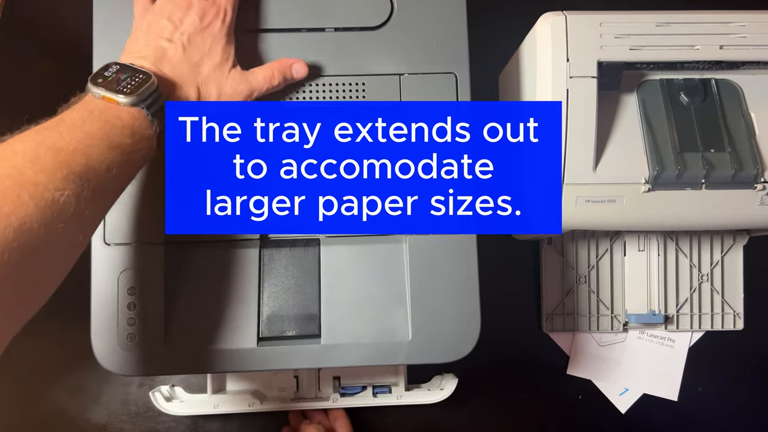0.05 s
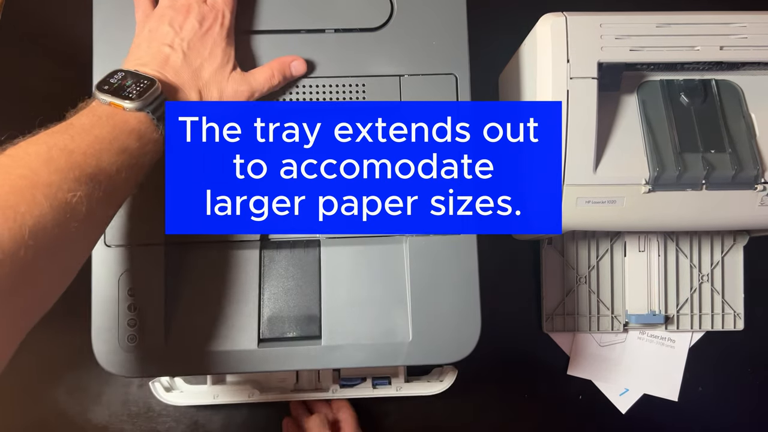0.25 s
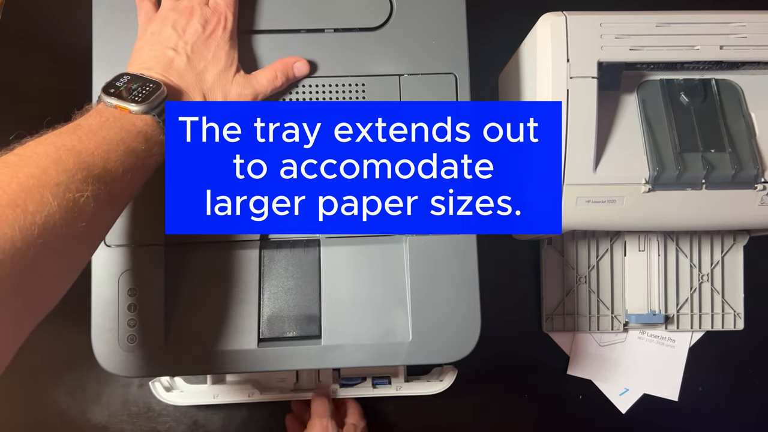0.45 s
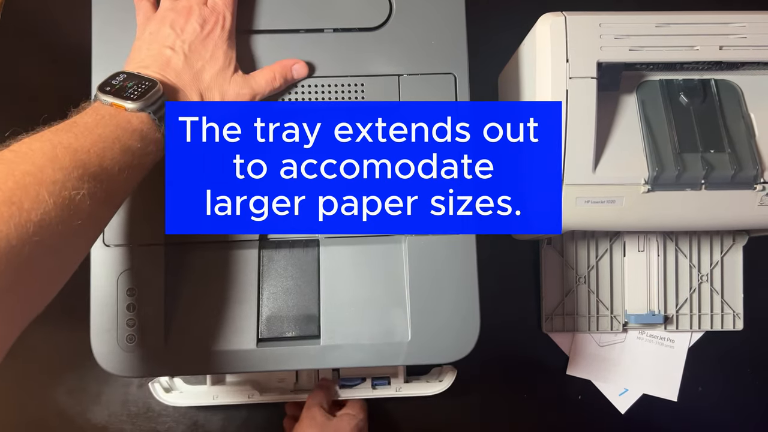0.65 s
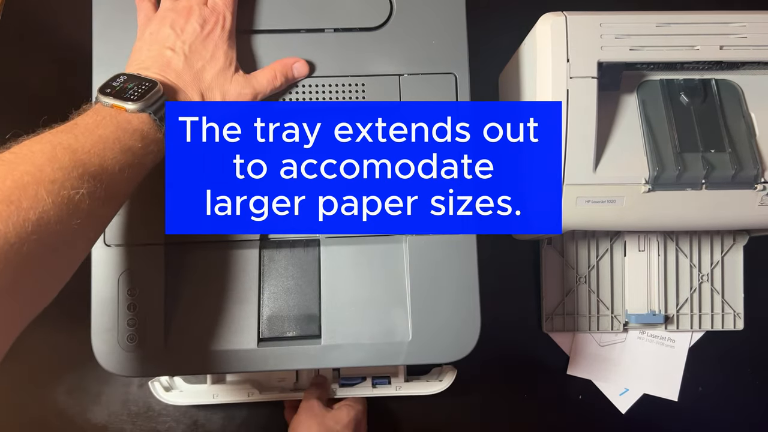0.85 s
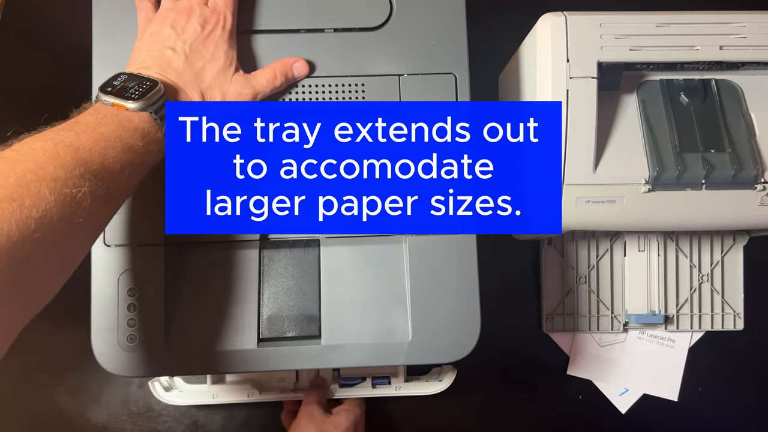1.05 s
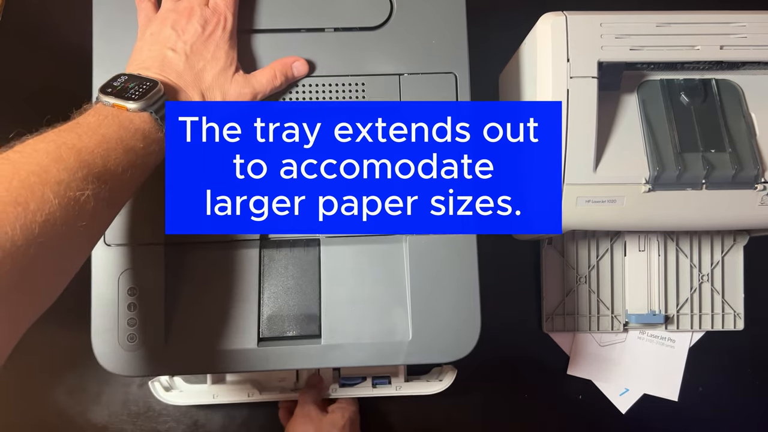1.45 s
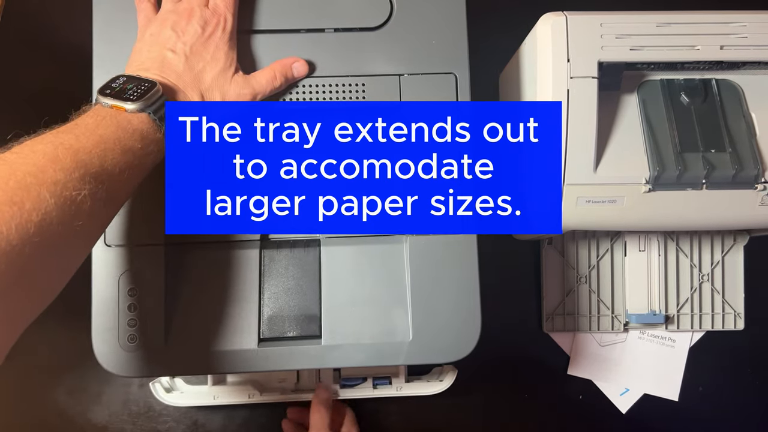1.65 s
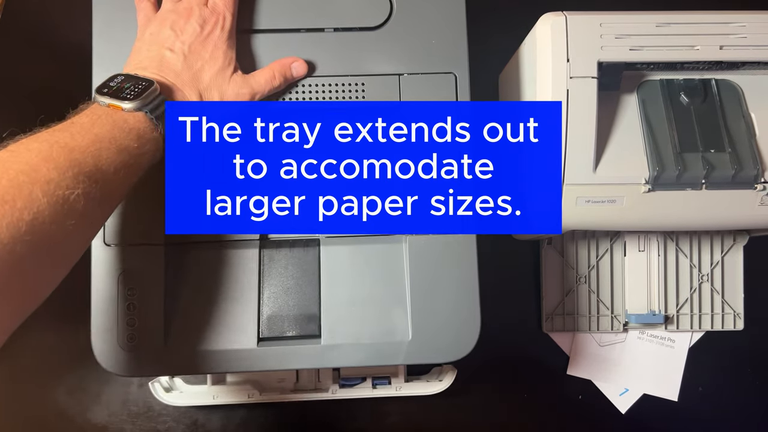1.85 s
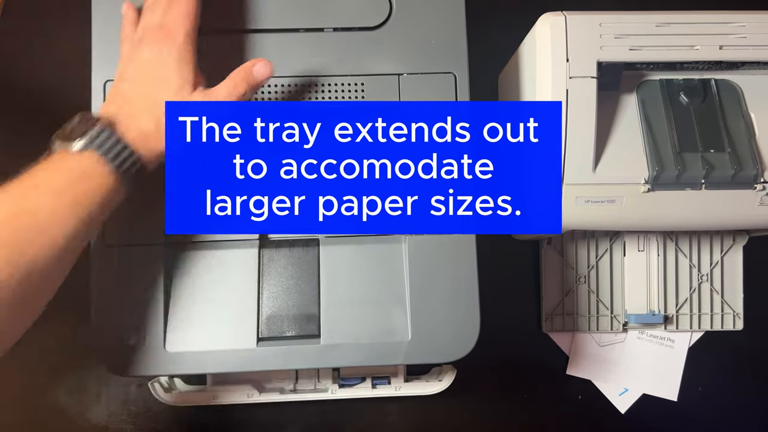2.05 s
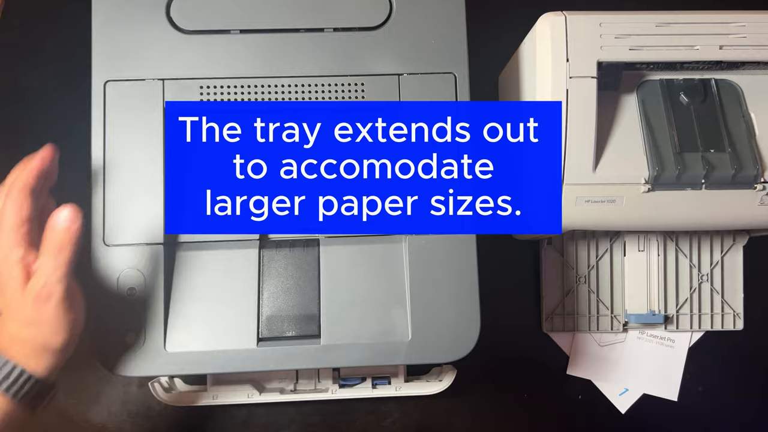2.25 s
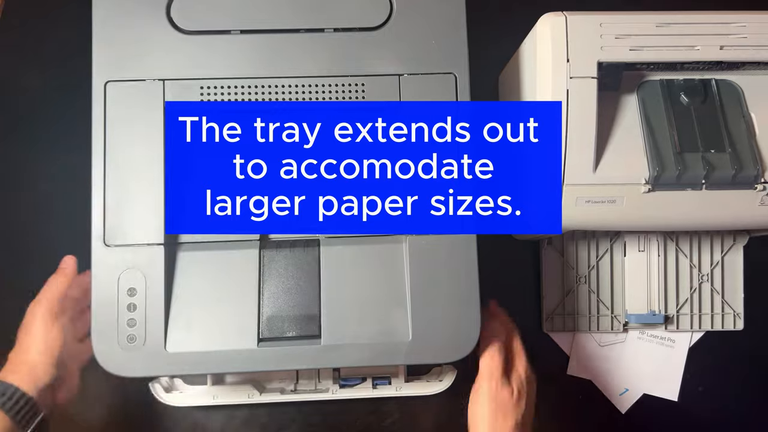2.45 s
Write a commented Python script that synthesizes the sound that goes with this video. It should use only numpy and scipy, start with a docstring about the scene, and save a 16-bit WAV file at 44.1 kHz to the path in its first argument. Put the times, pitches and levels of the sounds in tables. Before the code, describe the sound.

Close up in a small room, a plastic paper tray is shoved into a printer with a solid clunk. It snaps once, then rattles and knocks more softly as a hand jiggles it, over a faint low hum.

```python
"""In a small room, close by, a desk printer's plastic paper tray is shoved home, tugged and pushed again.
Sliding friction makes the tray scrape on its rails. Impacts excite damped resonances: the case clunks
and the desk booms, the tray knocks in its play and snaps against its end stop, and the catches tick.
Hands brush the plastic, and one lifts off the lid at the end. The room reverberates over a low hum."""
import sys
import numpy as np
from scipy import signal
from scipy.fft import rfft, irfft
from scipy.io import wavfile
from scipy.ndimage import uniform_filter1d

SR = 44100
rng = np.random.default_rng(int(sys.argv[2]) if len(sys.argv) > 2 else 0)


def int16_out(signal):
    """Quantize to a 16-bit WAV file."""
    q = np.round(np.clip(np.atleast_2d(signal).T, -1, 1) * 32767)
    wavfile.write(sys.argv[1], SR, q.astype(np.int16))


N = 110250

# mains hum partials: f/Hz, level/dB before the fade
HUM_PARTIALS = [(59.2, -57.5), (119, -64), (241, -67)]
# hand strokes: centre t/s, half length/s, level/dB, left minus right/dB
STROKES = [(0.006, 0.14, -51.5, -1), (1.377, 0.24, -53.5, -0.5), (1.988, 0.025, -49, 1)]
# pushes along the rails: start t/s, end t/s, final level/dB, relative depth of the swell
PUSHES = [(0.189, 0.243, -15, 26.5), (1.182, 1.202, -43.5, 0)]
# impacts: t/s, level/dB, bass/dB, treble/dB, T60/s of the noisy ring at 1 kHz
TRAY_HITS = [(.122, -51, 11.5, 9, 0.17), (.735, -39.5, 4, -4, 0.14), (.777, -39.5, -1, -7, 0.14),
             (.823, -30.5, 0.5, 0, 0.098), (.8415, -29.5, -1.5, -6.5, 0.032), (.8515, -36, 10.5, -9, 0.075),
             (1.085, -42, -7, 8, 0.075), (1.1048, -33.5, 4, 4, 0.081), (1.326, -45.5, -7, 9, 0.032),
             (1.357, -44, 15, -10, 0.046), (1.4612, -36, 4.5, -8, 0.13), (1.5925, -34, 1, -6, 0.16)]
CASE_HITS = [(0.2385, -12, -2, -8.5, 0.055), (.243, -17, -0.5, 2.5, .05), (0.2477, -14, 8, -1, 0.041),
             (0.257, -17.5, -7.5, -1.5, 0.17), (0.2736, -22.5, -4.5, -0.5, 0.17),
             (.302, -34.5, 8.5, 4, 0.1), (1.131, -29, 5, -7, 0.077), (1.138, -27.5, -1, -5, 0.12),
             (1.199, -23, -9, -4.5, 0.11), (1.2126, -32, 4.5, -1.5, 0.15), (1.865, -54, 12.5, -4.5, 0.14),
             (1.982, -50, 10.5, -3, 0.063)]
CATCH_HITS = [(.5462, -44.5, 16, -7, 0.073), (.7665, -43, 14.5, 5.5, 0.035), (.778, -41.5, -2, -2.5, 0.16),
              (1.416, -43, 0, -3, 0.091), (1.4255, -40.5, 16.5, -3.5, 0.069), (1.4625, -51, 3, -3.5, 0.026)]
STOP_HITS = [(.557, -18, -1.5, 2, 0.056)]
# spectral envelopes: f/Hz, relative spectral density/dB
AIR_SPECTRUM = [(25, -31), (55, -2.5), (90, -5), (250, -6), (400, -12.5), (1100, -19.5), (2000, -30.5),
                (5000, -44.5), (16000, -57)]
RUB_SPECTRUM = [(100, -1.5), (500, 1.5), (1000, -8), (2200, -11.5), (16000, -38)]
TRAY_SPECTRUM = [(60, -19.5), (190, -3), (400, -5), (720, -2), (1000, -5), (2300, -8.5), (3300, -16),
                 (7000, -30), (16000, -52.5)]
RAIL_SPECTRUM = [(100, -17.5), (220, -2), (500, -6.5), (1000, 0.5), (2000, -7.5), (16000, -21)]
CASE_SPECTRUM = [(60, -20.5), (200, -1), (500, -5.5), (1100, -6), (1700, -7), (7000, -15), (11000, -22),
                 (16000, -28.5)]
CATCH_SPECTRUM = [(100, -12), (1500, -0.5), (4000, -4), (6500, -10), (10000, -16), (16000, -40)]
# broad resonances of the part struck: f/Hz, width/Hz, gain/dB
TRAY_RESONANCES = [(238, 50, 2), (658, 70, 6), (1155, 90, 9.5), (1277, 96, 8.2), (1638, 120, 7.1),
                   (1910, 120, 6)]
CASE_RESONANCES = [(226, 95, 5), (438, 61, 7), (605, 90, 6.5), (880, 100, 3), (1160, 140, 5),
                   (2310, 240, 5), (4270, 230, 3.5)]
CATCH_RESONANCES = [(1636, 300, 3.9), (5270, 710, 6.7)]
STOP_RESONANCES = [(174, 210, 7.5), (840, 100, 7.5), (1139, 182, 14.5), (1495, 65, 7.5), (1820, 230, -4.5),
                   (2123, 330, 4.5), (2502, 700, 7)]
# normal modes of case and tray, and of the catches: f/Hz, relative level/dB, T60/s
BODY_MODES = [(242, -4, 0.3), (434.6, -6, 0.15), (611, -7.5, 0.24), (879, -7, .25), (1210, -7.5, 0.14),
              (1483, -13, 0.25), (2340, -10, .17), (2890, -14, 0.067)]
CATCH_MODES = [(5400, -12, 0.025)]
# reverberation: f/Hz, T60/s, level/dB
REVERB = [(100, 0.57, -7.5), (255.4, 0.54, -8.5), (500, 0.41, -7.5), (1000, .48, -10), (2003, 0.45, -8),
          (3500, .56, -7.5), (7000, 0.34, -6.5), (14000, 0.21, -11)]
# stereo width of the direct and the diffuse field: f/Hz, side relative to mid/dB
DIRECT_WIDTH = [(150, -23.5), (350, -17.5), (700, -2), (1400, -15), (3000, -3.5), (12000, -1)]
DIFFUSE_WIDTH = [(150, -14.5), (350, -13), (700, -1.5), (3000, -6)]
# stereo balance: f/Hz, left minus right/dB
BALANCE = [(150, -1.1), (400, -2), (1400, -2.3), (3500, -.5), (12000, -.2)]

WHITE = [(20, 0), (20000, 0)]  # flat spectrum: f/Hz, level/dB
SIDES = np.array([[1], [-1]])  # left, right
BANDS_HZ = 62.5 * 2. ** np.arange(9)
RING_N = 16384  # samples per impact


def undb(db):
    """Amplitude ratio of a level in decibels."""
    return 10 ** (np.asarray(db) / 20)


def at(table, hz, column=1):
    """Interpolation of a table along logarithmic frequency."""
    table = np.array(table, float)
    return np.interp(np.log(np.maximum(hz, 1)), np.log(table[:, 0]), table[:, column])


def add(out, start, sound):
    """Superposition of a sound from a given time on."""
    i = int(start * SR)
    out[:, i:i + sound.shape[1]] += sound[:, :N - i]


def decay(t, t60):
    """Exponential damping, 60 dB in t60."""
    return np.exp(-np.log(1000) * t / t60)


def noise(colour, width, size, grain=0):
    """Spectrum of shaped stereo noise; grain is random amplitude modulation that breaks it into clicks."""
    hz = np.fft.rfftfreq(size, 1 / SR)
    white = rng.standard_normal((2, size))
    white *= np.exp(grain * np.repeat(rng.standard_normal(size // 32 + 1), 32)[:size])
    mid, side = rfft(white / white.std())
    gain, spread = undb(at(colour, hz)), undb(at(width, hz))
    pair = (mid + SIDES * spread * side) / np.hypot(1, spread) * undb(SIDES * at(BALANCE, hz) / 2)
    return pair * gain / np.sqrt(np.mean(gain ** 2))


def octaves(spectrum, size):
    """Filter bank of overlapping octaves, giving pairs of centre f/Hz and waveform."""
    hz = np.fft.rfftfreq(size, 1 / SR)
    return [(centre, irfft(spectrum * at(np.c_[BANDS_HZ, weights], hz), size))
            for centre, weights in zip(BANDS_HZ, np.eye(len(BANDS_HZ)))]


def minimum_phase(sound, db):
    """Causal filter with a gain in dB at each frequency, formed by folding the cepstrum."""
    size = sound.shape[1]
    cepstrum = irfft(np.log(undb(db)))
    return irfft(rfft(sound) * np.exp(rfft(2 * cepstrum[:size // 2], size) - cepstrum[0]))


def chatter(t60, hold_s=0.0057, rise_cycles=0.99):
    """Contact chatter sustains a noise burst, then damping takes over; lows build and die more slowly."""
    t, hz = np.arange(RING_N) / SR, np.fft.rfftfreq(RING_N, 1 / SR)
    burst, energy = 0, []
    for centre, band in octaves(noise(WHITE, DIRECT_WIDTH, RING_N), RING_N):
        rise = 1 - np.exp(-t * centre / rise_cycles)
        envelope = rise * decay(np.maximum(t - hold_s, 0), t60 * (1000 / centre) ** 0.32)
        burst = burst + band * envelope
        energy.append((centre, np.sum(envelope ** 2)))
    # even out chance peaks and dips in the spectrum
    power = uniform_filter1d(np.mean(abs(rfft(burst)) ** 2, axis=0), size=41)
    return minimum_phase(burst, 10 * np.log10(at(energy, hz) / power))


def impacts(hits, colour, resonances, modes, modes_db, scatter_db=3):
    """Impact excitation: a burst passes through broad resonances and the normal modes ring freely."""
    out, t, freqs = np.zeros((2, N)), np.arange(RING_N) / SR, np.fft.rfftfreq(RING_N, 1 / SR)
    body_db = at(colour, freqs)
    body_db += sum(lift / (1 + (2 * (freqs - hz) / width) ** 2) for hz, width, lift in resonances)
    body_db -= 10 * np.log10(np.mean(undb(body_db) ** 2))  # unit mean power
    for start, db, bass_db, treble_db, t60 in hits:
        tilt = [(250, bass_db), (900, 0), (1500, 0), (5000, treble_db)]
        ring = minimum_phase(chatter(t60), body_db + at(tilt, freqs))
        for hz, mode_db, mode_t60 in modes:
            strength, detune, phase, skew = rng.standard_normal(4)
            gain = undb(modes_db + mode_db + at(tilt, hz) + scatter_db * strength)
            pan = undb(SIDES * at(BALANCE, hz) / 2)
            angle = 2 * np.pi * (hz * (1 + 0.0041 * detune) * t + phase)
            stereo_shift = SIDES * skew * undb(at(DIRECT_WIDTH, hz))
            envelope = decay(t, mode_t60) * (1 - np.exp(-t * hz))
            ring += gain * pan * np.sin(angle + stereo_shift) * envelope
        add(out, start, undb(db) * ring)
    return out


def hum_and_air(air_db=-58.5):
    """Near-harmonic partials of mains hum sink late in the scene, over the broadband noise of room air."""
    t = np.arange(N) / SR
    hum = sum(np.sqrt(2) * undb(db) * np.sin(2 * np.pi * (hz * t + rng.random()))
              for hz, db in HUM_PARTIALS)
    fade_db = np.interp(t, (1.3, 1.82), (4.5, -3))
    air = irfft(noise(AIR_SPECTRUM, DIFFUSE_WIDTH, N), N)
    return hum * undb(fade_db) + undb(air_db) * air


def hand_rubs():
    """Friction of skin on plastic gives noise in soft Gaussian swells."""
    t = np.arange(N) / SR
    swell = sum(undb(db + SIDES * pan_db / 2) * np.exp(-((t - centre) / half) ** 2)
                for centre, half, db, pan_db in STROKES)
    return swell * irfft(noise(RUB_SPECTRUM, DIRECT_WIDTH, N, grain=0.3), N)


def tray_knocks():
    """Backlash: the tray crosses its play and strikes, exciting its resonances."""
    return impacts(TRAY_HITS, TRAY_SPECTRUM, TRAY_RESONANCES, BODY_MODES, modes_db=-16.5)


def rail_scrape(stop_s=0.01):
    """Sliding friction grows louder and brighter as the tray gains speed, and dies when it stops."""
    t, out = np.arange(N) / SR, 0
    bands = octaves(noise(RAIL_SPECTRUM, DIRECT_WIDTH, N, grain=0.35), N)
    for start, end, db, swell in PUSHES:
        progress = np.clip((t - start) / (end - start), 0, 1)
        contact = np.minimum(10 * progress, 1) * np.exp(-np.maximum(t - end, 0) / stop_s)
        for hz, band in bands:
            swell_db = swell * (1.5 + 0.08 * np.log2(hz / 1000))
            out = out + band * contact * undb(db - swell_db * (1 - progress))
    return out


def case_clunks():
    """Free vibration of the case after the tray hits it or the hand lets go."""
    return impacts(CASE_HITS, CASE_SPECTRUM, CASE_RESONANCES, BODY_MODES, modes_db=-13)


def desk_boom(hz=66, t60=0.39, rise_s=0.047, coupling_db=-20):
    """Structure-borne sound: each clunk drives one low mode of the desk."""
    out, t = np.zeros((2, N)), np.arange(SR // 2) / SR
    boom = np.sin(2 * np.pi * hz * t) * decay(t, t60) * (1 - np.exp(-t / rise_s))
    for start, db, bass_db, _, _ in CASE_HITS:
        add(out, start, undb(coupling_db + db + bass_db) * boom[None])
    return out


def catch_ticks():
    """Light impacts of the catches excite one high, strongly damped mode."""
    return impacts(CATCH_HITS, CATCH_SPECTRUM, CATCH_RESONANCES, CATCH_MODES, modes_db=-5.5)


def end_stop_snap():
    """Sudden deceleration at the end stop excites the tray's midrange resonances."""
    return impacts(STOP_HITS, TRAY_SPECTRUM, STOP_RESONANCES, BODY_MODES, modes_db=-13)


def reverberation(sound, build_s=0.019):
    """The diffuse field of a small room builds up, then decays exponentially, the top treble first."""
    t, response = np.arange(SR) / SR, 0
    for hz, band in octaves(noise(WHITE, DIFFUSE_WIDTH, SR), SR):
        envelope = decay(t, at(REVERB, hz)) * (1 - np.exp(-(t / build_s) ** 2))
        envelope /= np.sqrt(np.sum(envelope ** 2))
        response = response + band * envelope * undb(at(REVERB, hz, column=2))
    return signal.fftconvolve(sound, response, axes=1)[:, :N]


def scene():
    """Superposition of the direct sound, its reverberation, the desk and the background."""
    handling = case_clunks() + rail_scrape() + hand_rubs()
    rattles = end_stop_snap() + tray_knocks() + catch_ticks()
    echo = undb(-1) * reverberation(handling) + undb(1) * reverberation(rattles)
    return handling + rattles + echo + desk_boom() + hum_and_air()


def record(dry, cutoff_hz=15850):
    """Band limiting: a steep elliptic low-pass filter removes the highest treble."""
    return signal.sosfilt(signal.ellip(10, .2, 70, cutoff_hz, fs=SR, output="sos"), dry)


dry = scene()
out = record(dry)
int16_out(out)
```